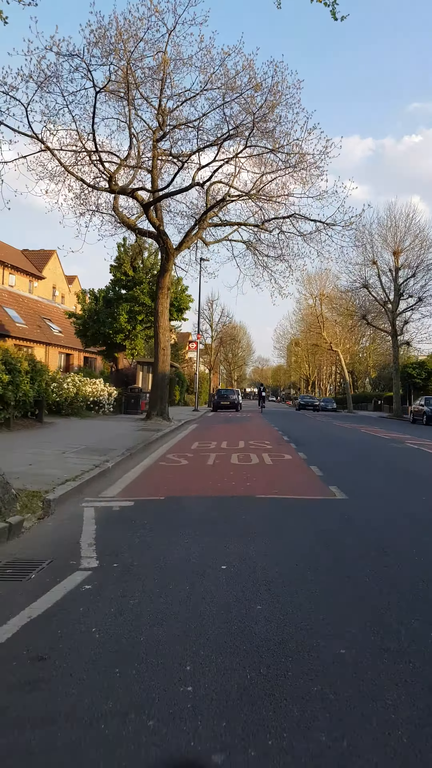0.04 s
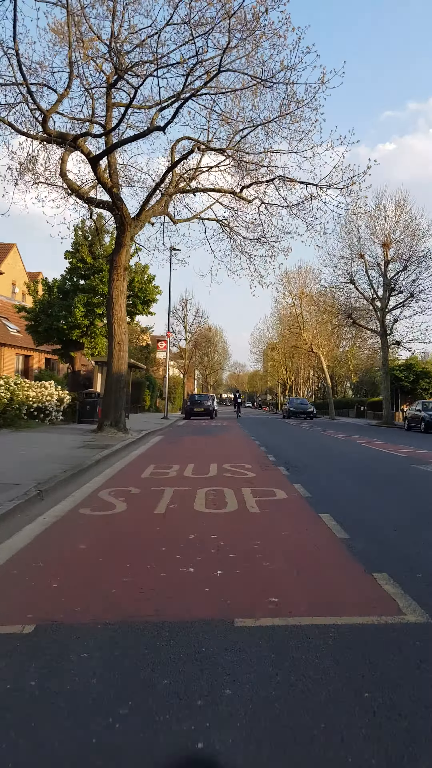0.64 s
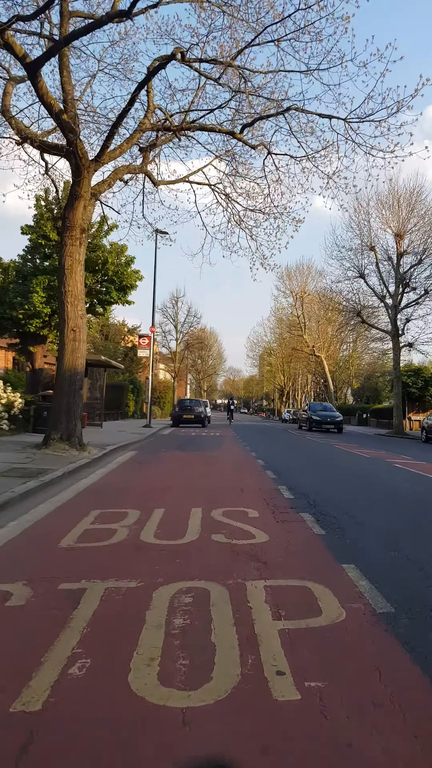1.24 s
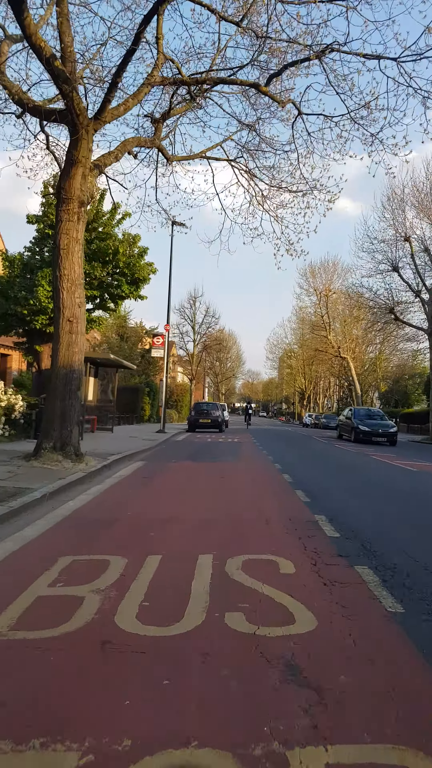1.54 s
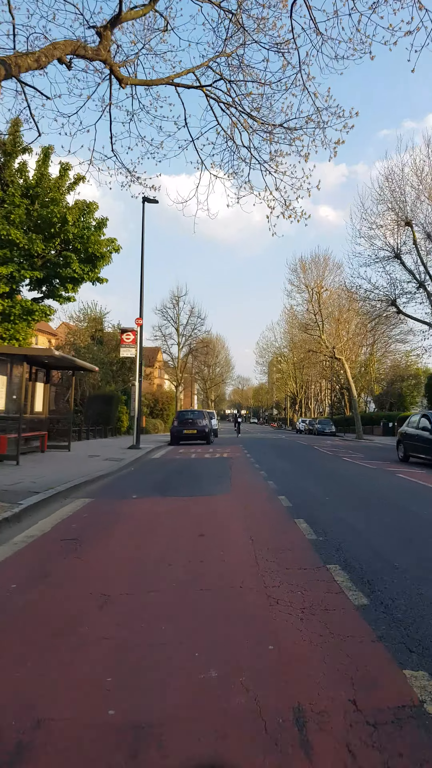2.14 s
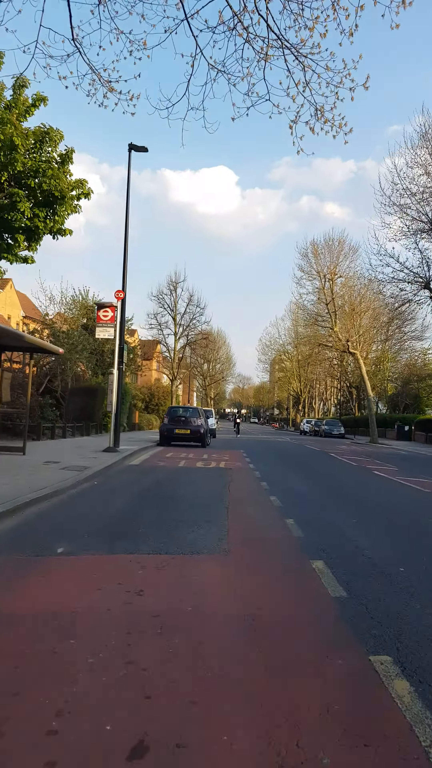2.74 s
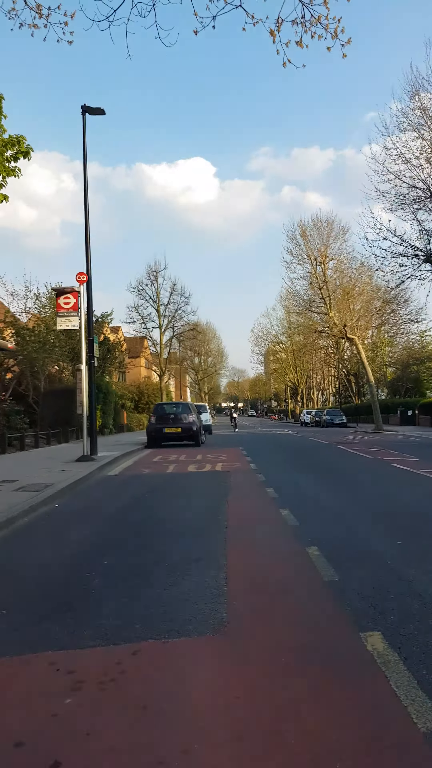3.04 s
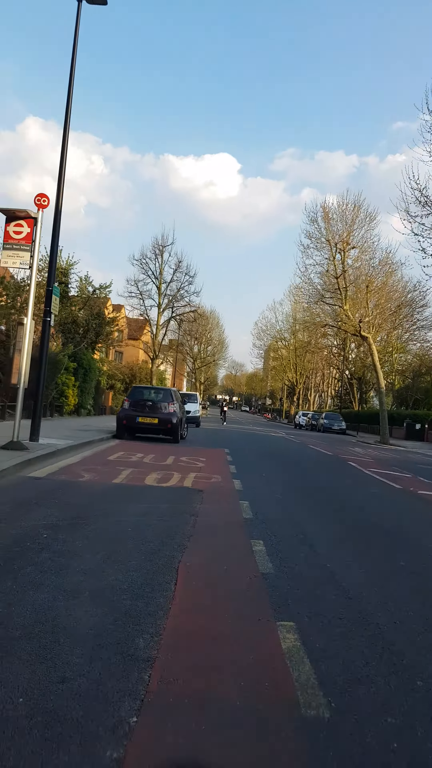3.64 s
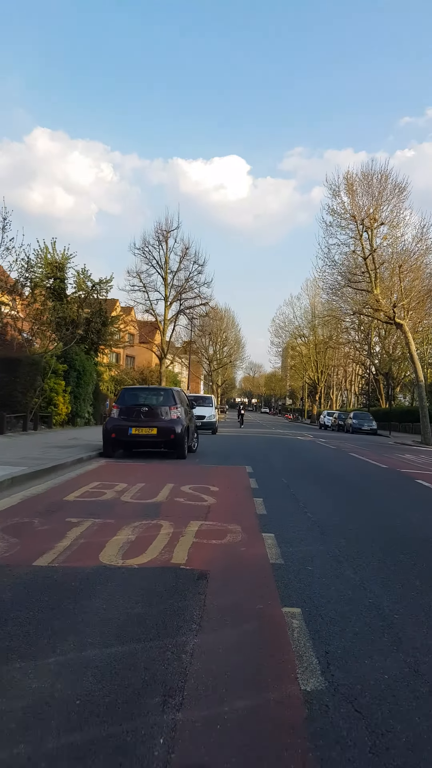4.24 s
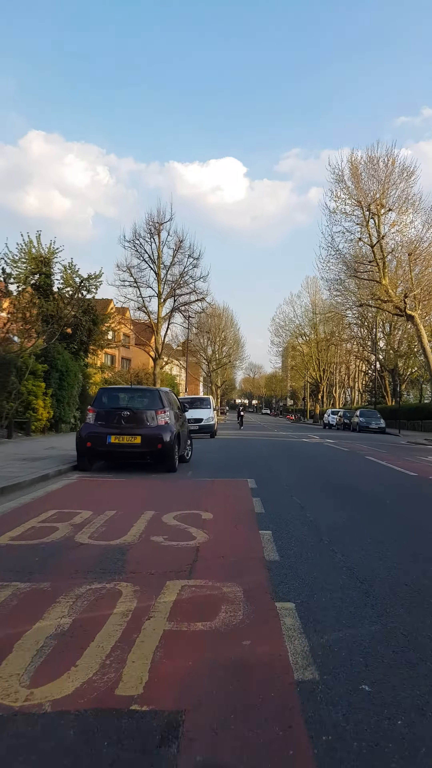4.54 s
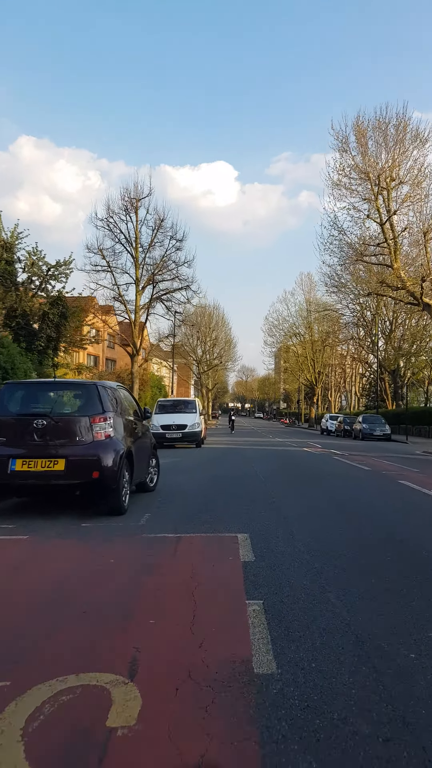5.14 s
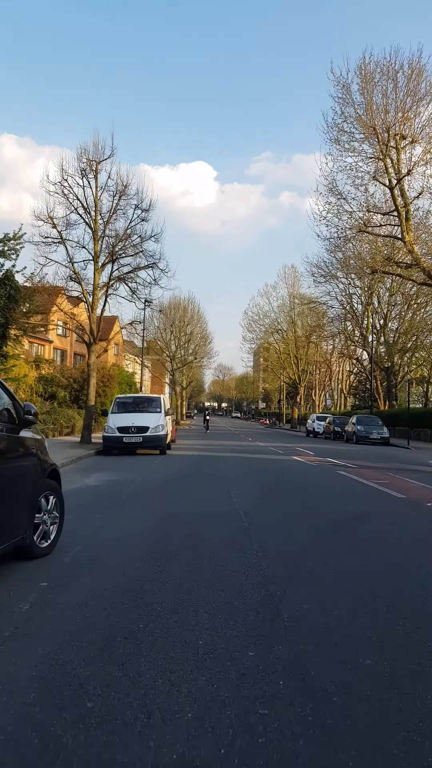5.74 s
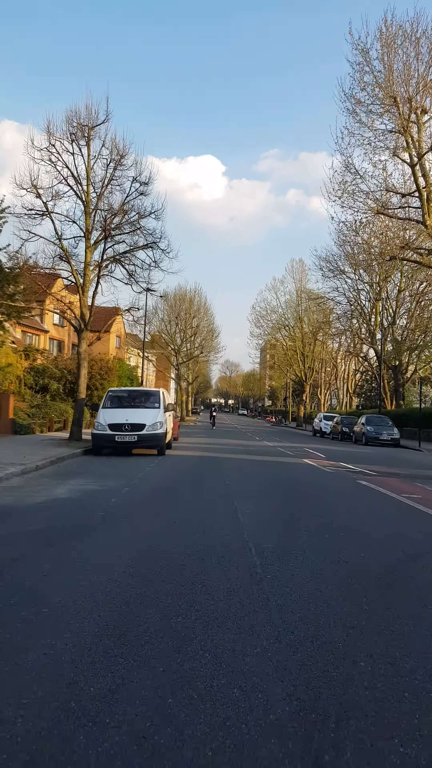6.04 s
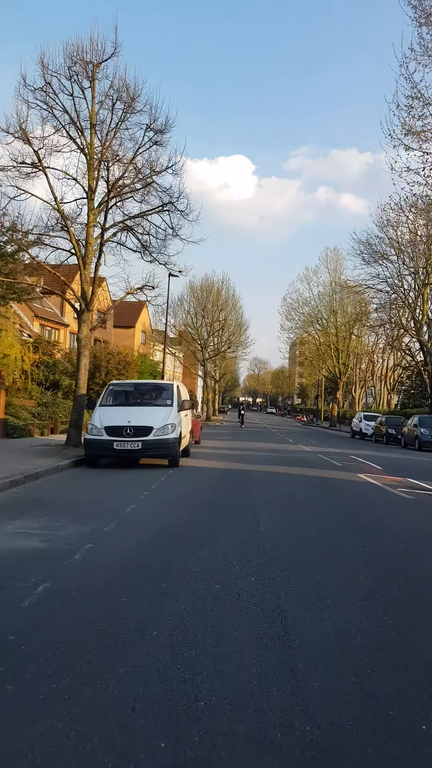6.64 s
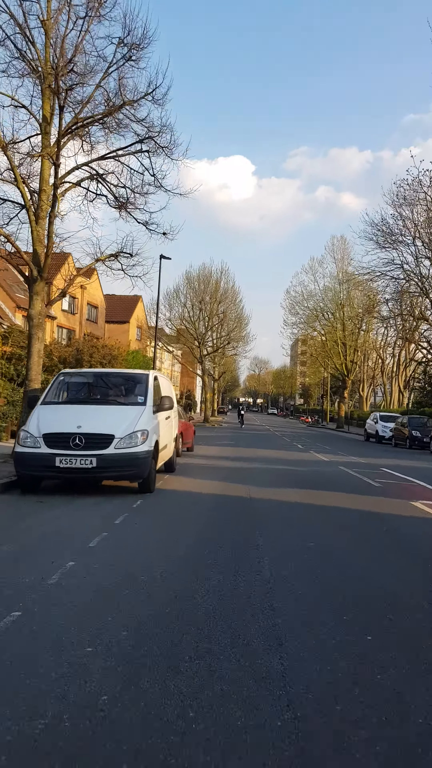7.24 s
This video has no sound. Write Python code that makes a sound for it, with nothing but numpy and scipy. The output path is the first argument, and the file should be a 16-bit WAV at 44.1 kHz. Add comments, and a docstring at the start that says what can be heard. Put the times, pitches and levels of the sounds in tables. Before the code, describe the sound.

A bicycle rolls along asphalt with a steady low rumble and hum, knocking and rattling in bursts over bumps.

```python
"""A bicycle rolls on asphalt, heard from a microphone clamped to its handlebar.
The road's grain drives handlebar, frame and fork into resonance, and the tyres roar. Seams and worn
paint jolt the front wheel; the impacts excite damped modes of the mount, which knocks and rattles.
Air buffets the microphone. Near the end hum and rumble swell on the right, a thin whirr on the left."""
import sys
import numpy as np
from scipy import signal
from scipy.fft import rfft, irfft, next_fast_len
from scipy.io import wavfile
from scipy.ndimage import uniform_filter1d, minimum_filter1d

SR = 44100
rng = np.random.default_rng(int(sys.argv[2]) if len(sys.argv) > 2 else 0)


def generate_wav(signal):
    """Clip the signal to [-1, 1] and save it as 16-bit WAV at the path in sys.argv[1]."""
    frames = np.transpose(np.atleast_2d(signal))
    scaled = np.clip(frames, -1, 1) * 32767
    pcm = np.round(scaled).astype(np.int16)
    wavfile.write(sys.argv[1], SR, pcm)


N = 321489


# coarseness of the asphalt: t/s, hum level/dB, fork level/dB, tyre level/dB
ROAD_LEVELS = [(0.04, -21.5, -44, -43.5), (0.24, -21.5, -45.5, -50), (0.54, -24, -42, -52),
               (0.86, -24.5, -43.5, -51.5), (1.51, -22.5, -42, -48.5), (1.79, -30, -51, -48),
               (2.37, -27, -50.5, -53), (2.95, -31, -49.5, -51.5), (3.12, -29, -49, -54),
               (4.12, -30, -46, -51), (5.03, -22, -40.5, -48), (5.39, -23.5, -41.5, -48),
               (6.13, -21.5, -43, -51), (6.43, -20.5, -44.5, -49.5), (6.9, -19.5, -41, -49),
               (7.26, -19.5, -43.5, -48)]
def rolling(hum_db, fork_db, tyre_db):
    """Forced vibration: rough asphalt drives the bicycle and its tyres, in uneven patches."""
    patches_db, grit_db, flutter_db = 1.3 * drift(14), 2.1 * drift(45), 2.5 * drift(30)
    bar = handlebar_drone(hum_db)
    frame = frame_hum(hum_db - 4.5)
    fork = fork_ring(fork_db + 1)
    fittings = fittings_ring(tyre_db - 23 + flutter_db)
    roar = tyre_roar(tyre_db + 17.5 + grit_db)
    body = (frame + (fork + roar) * panned(-1.1)) * rightward(2.3)
    return (bar * rightward(5.5) + body) * from_db(patches_db) + fittings + hiss(tyre_db - 27.5)


# lowest handlebar modes: f/Hz, bandwidth/Hz, level/dB
HANDLEBAR_MODES = [(221.84, 15, 0.5), (234.7, 11, -1)]
def handlebar_drone(level_db):
    """Resonance: two close modes of the bar select a low drone from the road's grain."""
    modes = sum(from_db(db) * shaken_mode(hz, width, alike=0.79, skirt=1.28)
                for hz, width, db in HANDLEBAR_MODES)
    return rms_one(modes) * panned(-3) * from_db(level_db)


# frame and handlebar modes: f/Hz, bandwidth/Hz, level/dB, left minus right/dB
FRAME_MODES = [(320.6, 26, -3, -4.5), (372.3, 20, -0.5, -5), (390.4, 16, 1.5, -1.5), (408.8, 16, -3, -5),
               (520.3, 18, -13, -11.5)]
def frame_hum(level_db):
    """Modal superposition: narrow, randomly driven modes add up to a hum."""
    modes = sum(from_db(db) * panned(side) * shaken_mode(hz, width, alike=0.94, skirt=1.2)
                for hz, width, db, side in FRAME_MODES)
    return rms_one(modes) * from_db(level_db)


# fork and mount modes: f/Hz, bandwidth/Hz, level/dB, stereo correlation
FORK_MODES = [(703.4, 41, -1.5, 0.91), (775.7, 32, -3, 0.62), (978, 34, -6.5, -0.54)]
def fork_ring(level_db):
    """Resonance: the higher modes of fork and mount ring above the hum."""
    modes = sum(from_db(db) * shaken_mode(hz, width, alike, skirt=1.25)
                for hz, width, db, alike in FORK_MODES)
    return rms_one(modes) * from_db(level_db)


# spectrum of tyre on asphalt: f/Hz, level/dB
TYRE_SPECTRUM = [(90, 4), (165, 14.5), (280, 1), (450, -4.5), (640, -3), (860, -13), (1100, -14),
                 (1300, -17.5), (1800, -21.5), (2050, -28.5), (2500, -30), (3200, -48), (4000, -52),
                 (5200, -57), (9000, -77.5)]
def tyre_roar(level_db):
    """Roughness excitation: the tyres radiate broadband noise, strongest in the bass."""
    return noise(TYRE_SPECTRUM) * from_db(level_db)


# course of the rumble: t/s, air and fork level/dB, wheel level/dB
RUMBLE_LEVELS = [(0.04, -24, -22.5), (0.26, -24.5, -19.5), (0.46, -33, -29), (0.72, -21.5, -30),
                 (0.86, -27.5, -31), (1.37, -27, -27), (2.01, -28, -16.5), (2.82, -33, -37),
                 (3.08, -30, -31.5), (3.48, -37, -29), (4.34, -34, -31), (4.68, -30.5, -25),
                 (5.87, -24, -26.5), (5.99, -29.5, -41), (6.31, -29.5, -34.5), (6.64, -22, -26.5),
                 (7.02, -27, -29.5), (7.26, -22, -19.5)]
# spectra of the trembling wheel and of the buffeting air: f/Hz, level/dB
WHEEL_SPECTRUM = [(18, -23), (32, -7.5), (50, 20.5), (65, 8), (100, 1), (200, -61.5), (800, -100)]
AIR_SPECTRUM = [(22, -17), (40, -11), (62, -9), (80, 0), (100, 0.5), (135, -4.5), (190, -10), (280, -34),
                (600, -57.5), (2000, -95)]
def rumble(air_db, wheel_db):
    """Vibration and turbulence: the wheel trembles, the fork flexes and air buffets, all in surges."""
    surge_db = 1.7 * drift(7.4)
    wheel = noise(WHEEL_SPECTRUM) * from_db(wheel_db + surge_db - 0.5 + 2 * drift(8.6))
    flex = rms_one(shaken_mode(hz=81.5, width=20, alike=0.99, skirt=1.3))
    throb = flex * from_db(air_db + surge_db + 0.5)
    buffet = noise(AIR_SPECTRUM) * from_db(air_db + surge_db + 4.5)
    return wheel + throb + buffet


# dips under the front wheel: t/s, level/dB, bounce f/Hz
DIPS = [(0.027, -4, 96), (0.12, -14.5, 111.5), (0.195, -5, 80), (0.374, -10.5, 77), (1.375, -7.5, 74.4),
        (1.646, -6, 54.5), (1.761, -10.5, 46), (1.84, -2.5, 50.3), (1.936, 3.5, 46.6), (2.085, -5, 52.6),
        (2.14, -0.5, 50.5), (2.299, -8.5, 52.4), (2.335, -11, 71), (2.476, -8.5, 43.6), (2.853, -8.5, 44.4),
        (3.019, -8.5, 83.4), (3.184, -9, 61.9), (3.32, -8, 53.8), (3.898, -11.5, 92), (4.048, -6.5, 62),
        (4.345, -4, 54), (4.541, -9.5, 52.4), (5.412, 0, 46.6), (5.466, -6.5, 44), (5.7, -5.5, 54.4),
        (6.705, -18, 80), (7.053, -7, 46.5), (7.236, -6, 64)]
def jolts(dip_peak_s=0.0086, kick_peak_s=0.0046, kick_hz=105, kick_db=8.5, twist_db=4):
    """Damped oscillation: at each dip or knock the wheel bounces and twists the bar to one side."""
    out, t = np.zeros((2, N)), np.arange(SR // 8) / SR
    bumps = [(s, db, hz, dip_peak_s) for s, db, hz in DIPS]
    bumps += [(s, db + kick_db, kick_hz, kick_peak_s) for s, db, *_ in MOUNT_KNOCKS]
    for (s, db, hz, peak_s), twist in zip(bumps, rng.standard_normal(len(bumps))):
        at = int(s * SR)
        envelope = (t / peak_s) ** 2 * np.exp(2 - 2 * t / peak_s)
        bounce = from_db(db - 0.5) * envelope * -np.sin(2 * np.pi * hz * t)
        out[:, at:at + len(t)] += bounce[:N - at] * panned(twist_db * twist)
    return out


# knocks and rattling contacts of the mount:
# t/s, thud level/dB, clack level/dB, chink level/dB, tick level/dB
MOUNT_KNOCKS = [(0.069, -33, -41, -65, -66), (0.189, -23.5, -32.5, -54, -56.5),
                (1.548, -29.5, -28, -36, -57), (1.556, -21, -26.5, -36, -46.5),
                (1.678, -21, -28.5, -52.5, -44), (1.701, -41, -33, -35, -57),
                (1.7056, -13, -22.5, -45, -53), (1.727, -38, -31, -44, -63), (1.783, -32, -27.5, -36, -51),
                (1.813, -33.5, -31, -44, -53), (1.8225, -23, -29.5, -52.5, -44),
                (1.8301, -18.5, -24, -36, -56), (1.8411, -26, -30, -54, -51), (1.848, -31, -43, -38, -54),
                (1.9252, -19.5, -27, -48, -45), (1.944, -23, -25.5, -47, -46),
                (1.9612, -28, -31.5, -45, -53), (1.984, -21, -35, -41.5, -58),
                (2.0825, -19.5, -32, -55, -55), (2.107, -22.5, -22.5, -33, -53),
                (2.112, -25, -38, -54, -53), (2.1296, -15.5, -23.5, -42, -49), (2.1412, -33, -39, -47, -65),
                (2.1484, -37, -32.5, -39, -59), (2.153, -28, -33, -54, -64), (2.2167, -26.5, -43, -47, -62),
                (2.2339, -37, -48.5, -41.5, -59), (2.243, -27.5, -23, -42, -48),
                (2.3033, -16, -31, -33, -50), (2.338, -27, -33, -41, -48), (2.441, -12.5, -21.5, -45, -47),
                (2.4658, -19, -27.5, -47, -48.5), (2.4733, -28, -30, -49, -55),
                (2.485, -30, -31.5, -43.5, -49), (2.5332, -21, -29, -38.5, -55),
                (2.585, -26, -30, -45, -63), (2.5941, -25.5, -28, -43, -54),
                (2.872, -24.5, -32, -37.5, -61), (2.876, -34, -34, -44, -63),
                (3.0174, -26.5, -38.5, -46, -50.5), (3.027, -32, -45, -42, -56),
                (3.044, -27, -30, -46.5, -62), (3.067, -24, -32, -40, -56), (3.0862, -43, -29.5, -49, -61),
                (3.141, -30.5, -29.5, -56, -57), (3.3277, -31.5, -37, -42, -60.5),
                (3.3367, -24, -26, -45, -53), (4.353, -28, -34.5, -36.5, -68), (4.359, -36, -38, -51, -66),
                (4.658, -37, -30, -53, -75), (4.672, -37, -39.5, -42, -48), (4.958, -30.5, -31, -48, -67.5),
                (5.3947, -34, -35, -46, -52), (5.402, -15, -30.5, -47, -41.5), (5.4195, -29, -24, -43, -64),
                (5.4543, -24, -34, -51.5, -47), (5.474, -36, -36, -38, -68), (5.578, -28, -29.5, -55, -57),
                (5.584, -31, -30, -54, -60), (5.596, -13.5, -38, -64.5, -50),
                (5.6172, -12.5, -26, -33.5, -48), (5.747, -28, -31.5, -47, -46),
                (5.7566, -16, -37, -50, -69), (5.909, -27, -43.5, -54, -65), (6.018, -32, -35.5, -60, -62)]
# modes of the damped clamp: f/Hz, level/dB, T60/s, left minus right/dB
CLAMP_MODES = [(178, 6.5, 0.03, 8), (278, 1.5, 0.027, -6.5), (466, -0.5, 0.017, -12), (580, -6.5, 0.021, 3),
               (693, -17.5, 0.014, 3)]
# modes of the mount's hollow shell and metal parts: f/Hz, level/dB, T60/s, stereo correlation
SHELL_MODES = [(966, -3, 0.018, -0.3), (1104, -3.5, 0.025, -0.74), (1440, -7, 0.016, -0.7),
               (1700, -12, 0.014, -0.059), (1840, -13, 0.0064, 0.19)]
METAL_MODES = [(2310, -5, 0.012, 0.49), (2680, -5.5, 0.0085, 0.59), (2910, -9.5, 0.0098, 0.45),
               (3750, -14, 0.0072, 0.2), (4550, -19.5, 0.011, 0.2), (5400, -18, 0.0074, 0.089)]
def knocks(contact_hz=1050, usual_db=-17, brightening=0.11):
    """Impact excitation: at each contact the clamp thuds, the shell clacks and the metal chinks."""
    s, thud_db, clack_db, chink_db, _ = np.transpose(MOUNT_KNOCKS)
    contact = signal.butter(3, contact_hz, fs=SR, output="sos")
    out = struck(s, clack_db - 1.5, SHELL_MODES) + struck(s, chink_db - 2.5, METAL_MODES)
    pivot_hz = CLAMP_MODES[1][0]
    for hz, db, t60, side in CLAMP_MODES:
        tilt_db = brightening * (thud_db - usual_db) * np.log2(hz / pivot_hz)  # harder is brighter
        blow = signal.sosfilt(contact, clicks(s, thud_db - 0.5 + tilt_db))
        out += from_db(db) * panned(side) * ring(blow, hz, t60)
    return out


def skitter(early_s=0.003, late_s=0.013, uneven_db=9, count=6):
    """Multiple contact: weaker clacks and chinks cluster around each knock."""
    s, thud_db, clack_db, _, _ = np.transpose(MOUNT_KNOCKS)
    when, weakness = np.moveaxis(rng.random((len(s), count, 2)), 2, 0)
    times = (s[:, None] - early_s + (early_s + late_s) * when).ravel()
    shell_db = (clack_db[:, None] - 9.5 - uneven_db * weakness).ravel()
    metal_db = (np.minimum(thud_db, -18)[:, None] - 27 - uneven_db * weakness).ravel()
    return struck(times, shell_db, SHELL_MODES) + struck(times, metal_db, METAL_MODES)


def chatter(settle_t60=0.3, uneven_db=13, count=2400):
    """Energy decay: each knock leaves the mount shaking, with tiny contacts that fade as it settles."""
    s, _, clack_db, _, _ = np.transpose(MOUNT_KNOCKS)
    energy = dying(clicks(s, 2 * clack_db), settle_t60 / 2)
    when, weakness = rng.random((count, 2)).T
    times = when * N / SR
    level_db = 10 * np.log10(energy[(when * N).astype(int)]) - uneven_db * weakness
    fine = coloured(clicks(times, level_db - 18) * rng.standard_normal((2, N)), TICK_SPECTRUM)
    return struck(times, level_db - 21, SHELL_MODES) + struck(times, level_db - 25, METAL_MODES) + fine


# crisp metallic snaps that sharpen some of the knocks: t/s, level/dB
METALLIC_SNAPS = [(1.5486, -47), (1.7271, -37), (1.7832, -38), (1.8143, -40), (1.8485, -36), (1.9617, -35),
                  (1.9852, -45), (2.1283, -32), (2.1483, -45), (2.2161, -47), (2.305, -32.5), (2.487, -40),
                  (2.5335, -41), (2.5867, -45), (3.0873, -43), (5.618, -34)]
# modes of a snap: f/Hz, level/dB, T60/s, stereo correlation
SNAP_MODES = [(1750, -6.5, 0.006, 0.3), (2650, -0.5, 0.005, 0.5), (3820, -2.5, 0.0024, 0.27),
              (4620, -6.5, 0.0032, 0.3)]
def snaps():
    """Impulse response: each snap is one hard contact whose high modes ring for a few milliseconds."""
    s, level_db = np.transpose(METALLIC_SNAPS)
    return struck(s, level_db - 3.5, SNAP_MODES)


# loose parts ticking on their own: t/s, level/dB
LOOSE_TICKS = [(0.017, -33), (0.115, -42.5), (0.186, -49.5), (0.214, -52), (0.945, -54), (0.978, -52.5),
               (1.368, -47), (1.640, -53), (1.882, -54), (2.286, -50), (2.847, -45.5), (4.041, -44.5),
               (4.335, -46.5), (4.535, -46), (4.611, -56), (4.640, -57), (4.839, -55), (4.982, -54.5),
               (5.037, -56.5), (5.081, -54), (5.33, -48), (5.337, -52), (5.363, -51), (5.423, -55),
               (5.46, -53), (5.558, -52.5), (5.694, -51), (5.739, -45.5), (6.627, -55), (6.702, -49),
               (6.841, -56), (7.055, -59)]
# spectrum of a tick: f/Hz, level/dB
TICK_SPECTRUM = [(1500, -6), (4500, -2), (6800, -6), (8800, -1), (12000, -2), (14000, -7), (15500, -11)]
def ticks(hum_db, bounce, grit_per_s=70, extra_per_swing=400):
    """Brief contacts are broadband: loose parts tick, alone and on knocks; grit hits the mudguard."""
    s, level_db = np.transpose(LOOSE_TICKS + [(row[0], row[-1]) for row in MOUNT_KNOCKS])
    parts = uniform_filter1d(dying(clicks(s, level_db + 2), t60=0.011), size=90)
    swing = np.minimum(np.abs(bounce).mean(axis=0), 0.3)  # a bouncing wheel throws more grit
    grit_db = hum_db - 31.5 + 8 * swing + rng.uniform(-12, 4, N)
    hits = rng.random(N) < (grit_per_s + extra_per_swing * swing) / SR
    grit = dying(hits * from_db(grit_db) + 1e-18, t60=0.0025)
    envelope = uniform_filter1d(parts + grit, size=36)
    return coloured(envelope * rng.standard_normal((2, N)), TICK_SPECTRUM)


def tyre_rasp(middle_s=3.7, spread_s=0.33):
    """Roughness excitation: the tyre rasps faintly while it crosses a mended patch."""
    on_patch = np.exp(-((np.arange(N) / SR - middle_s) / spread_s) ** 2)
    band = rms_one(shaken_mode(hz=2000, width=700, alike=0.4))
    return band * on_patch * from_db(-66 + 2 * drift(45))


# modes of small metal fittings: f/Hz, bandwidth/Hz, level/dB
FITTING_MODES = [(2870, 340, 1), (3870, 280, -0.5), (4600, 110, -8), (6370, 95, -6)]
def fittings_ring(level_db):
    """Resonance: small fittings, shaken by the road, sing faintly in the treble."""
    modes = sum(from_db(db) * shaken_mode(hz, width, alike=0, skirt=3.3)
                for hz, width, db in FITTING_MODES)
    return rms_one(modes) * from_db(level_db)


# spectrum of the rolling hiss: f/Hz, level/dB
HISS_SPECTRUM = [(2000, -10), (4000, -1), (5500, -1), (7000, -3), (9000, 1), (11500, -2), (15500, -16)]
def hiss(level_db):
    """Random amplitude modulation: a faint treble hiss flickers, left of centre."""
    return noise(HISS_SPECTRUM) * from_db(level_db + 2.1 * drift(60)) * panned(3.7)


# resonances of the whirr: f/Hz, bandwidth/Hz, level/dB, modulation depth/dB
WHIRR_MODES = [(3090, 220, -76, 2.5), (3850, 350, -77, 2.5), (4570, 150, -77, 3)]
def whirr(pulsing_hz=16, left_db=7):
    """Amplitude modulation: narrow resonances pulse independently and swell near the end."""
    out = np.zeros(N)
    for hz, width, db, depth_db in WHIRR_MODES:
        band = rms_one(shaken_mode(hz, width, alike=0, skirt=1.6))
        out = out + band * from_db(db + depth_db * np.minimum(drift(pulsing_hz), 2))
    return out * panned(left_db) * swelling()


# likeness of left and right in the rolling noise: f/Hz, stereo correlation
NOISE_CORRELATION = [(30, 0.94), (55, 0.97), (90, 0.37), (200, 0.94), (700, 0.57), (1050, 0.83),
                     (1500, 0.031), (2300, 0.27), (4000, 0.14), (12000, 0.9)]
def noise(spectrum):
    """Spectral shaping: stereo noise of unit rms whose correlation depends on frequency."""
    size = next_fast_len(N, real=True)
    mid, side = rfft(rng.standard_normal((2, size)))
    hz = np.arange(len(mid)) * SR / size
    shaped = pair(mid, side, at_hz(NOISE_CORRELATION, hz)) * from_db(at_hz(spectrum, hz))
    return rms_one(irfft(shaped, size)[:, :N])


def shaken_mode(hz, width, alike, skirt=1.1):
    """Forced resonance: noise from hz / skirt to hz * skirt drives a two-pole resonator."""
    band = signal.butter(2, [hz / skirt, hz * skirt], "band", fs=SR, output="sos")
    force = signal.sosfilt(band, pair(*rng.standard_normal((2, N)), alike))
    r, w = np.exp(-np.pi * width / SR), 2 * np.pi * hz / SR
    return signal.lfilter(np.array([1, 0, -1]) * (1 - r * r) / 2, [1, -2 * r * np.cos(w), r * r], force)


def struck(times, level_db, modes, scatter_db=3, softness_hz=4600):
    """Modal superposition: contacts ring each mode at random strength; their softness dulls the top."""
    out = np.zeros((2, N))
    at = np.clip(np.round(times * SR).astype(int), 0, N - 1)
    chance = rng.standard_normal((len(times), len(modes), 3))
    for (hz, db, t60, alike), (mid, side, luck) in zip(modes, chance.transpose(1, 2, 0)):
        direction = pair(np.sign(mid), np.sign(side), alike)
        blows = np.zeros((2, N)) + 1e-18
        blows[:, at] = direction * from_db(level_db + db + scatter_db * luck)
        out += ring(blows, hz, t60)
    return signal.sosfilt(signal.butter(2, softness_hz, fs=SR, output="sos"), out)


def ring(x, hz, t60):
    """Free vibration: a unit impulse starts a decaying sine of height 1."""
    r, w = from_db(-60 / (t60 * SR)), 2 * np.pi * hz / SR
    return signal.lfilter([0, np.sin(w)], [1, -2 * r * np.cos(w), r * r], x)


def clicks(times, level_db):
    """One impulse for each contact."""
    out = np.zeros(N)
    out[np.clip(np.round(times * SR).astype(int), 0, N - 1)] = from_db(level_db)
    return out + 1e-18


def dying(x, t60):
    """Exponential decay: every impulse falls 60 dB in t60 seconds."""
    return signal.lfilter([1], [1, -from_db(-60 / (t60 * SR))], x)


def coloured(x, spectrum, size=4096):
    """Minimum-phase filtering: folding the cepstrum gives a causal response with this spectrum."""
    hz = np.arange(size // 2 + 1) * SR / size
    cepstrum = irfft(np.log(from_db(at_hz(spectrum, hz))))
    cepstrum[1:size // 2] *= 2
    cepstrum[size // 2 + 1:] = 0
    response = irfft(np.exp(rfft(cepstrum)))
    return signal.fftconvolve(x, response[None] / np.linalg.norm(response), axes=1)[:, :N]


def drift(corner_hz, hop=40):
    """Random fluctuation: low-passed noise of unit rms."""
    r = np.exp(-2 * np.pi * corner_hz * hop / SR)
    slow = signal.lfilter([1], [1, -2 * r, r * r], rng.standard_normal(N // hop + 2002))[2000:]
    return np.interp(np.arange(N) / hop, np.arange(len(slow)), rms_one(slow))


def pair(mid, side, alike):
    """Mid-side mixing: two unrelated signals give channels of correlation `alike`."""
    alike = np.clip(alike, -.99, .99)
    return np.sqrt(1 + alike) * mid + np.sqrt(1 - alike) * side * np.array([[1], [-1]])


def panned(side_db):
    """Channel gains for a level difference, left minus right."""
    return from_db(np.array([[.5], [-.5]]) * side_db)


def swelling(start_s=6.49, rise_s=0.51):
    """Linear ramp from 0 to 1 near the end."""
    return np.clip((np.arange(N) / SR - start_s) / rise_s, 0, 1)


def rightward(depth_db):
    """A growing level difference shifts the sound to the right near the end."""
    return panned(-depth_db * swelling())


def from_db(db):
    """Decibels to gain."""
    return 10 ** (np.asarray(db) / 20)


def rms_one(x):
    """Scale to unit rms."""
    return x / np.sqrt(np.mean(x ** 2) + 1e-20)


def in_time(rows):
    """Interpolate each column of a time table at every sample."""
    s, *columns = np.transpose(rows)
    return [np.interp(np.arange(N) / SR, s, column) for column in columns]


def at_hz(points, hz):
    """Interpolate a table on a log-frequency axis."""
    f, value = np.transpose(points)
    return np.interp(np.log(np.maximum(hz, 1)), np.log(f), value)


def scene():
    """Superposition: sound carried by the handlebar adds to airborne sound from close by."""
    hum_db, fork_db, tyre_db = in_time(ROAD_LEVELS)
    bounce = jolts()
    bass = (rumble(*in_time(RUMBLE_LEVELS)) + bounce) * panned(0.3) * rightward(5)
    rattle = knocks() + snaps() + skitter() + chatter() + ticks(hum_db, bounce)
    return rolling(hum_db, fork_db, tyre_db) + bass + rattle + tyre_rasp() + whirr()


def record(dry, cutoff_hz=15800, fade_s=0.002):
    """Peak and band limiting: a smooth gain holds peaks down, the ends fade and the top is cut."""
    allowed_gain = 1 / np.maximum(np.abs(dry).max(axis=0), 1)
    gain = uniform_filter1d(minimum_filter1d(allowed_gain, size=441), size=441)
    from_end_s = np.minimum(np.arange(N), np.arange(N)[::-1]) / SR
    fades = np.minimum(from_end_s / fade_s, 1)
    lowpass = signal.ellip(10, .2, 90, cutoff_hz, fs=SR, output="sos")
    return signal.sosfilt(lowpass, dry * gain * fades)


dry = scene()
out = record(dry)
generate_wav(out)
```